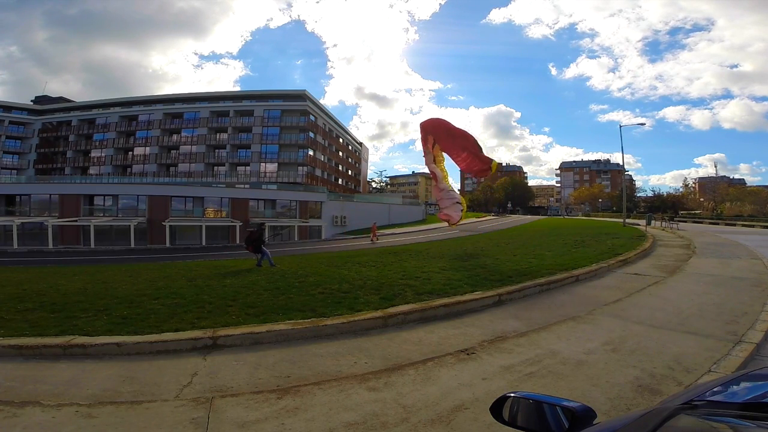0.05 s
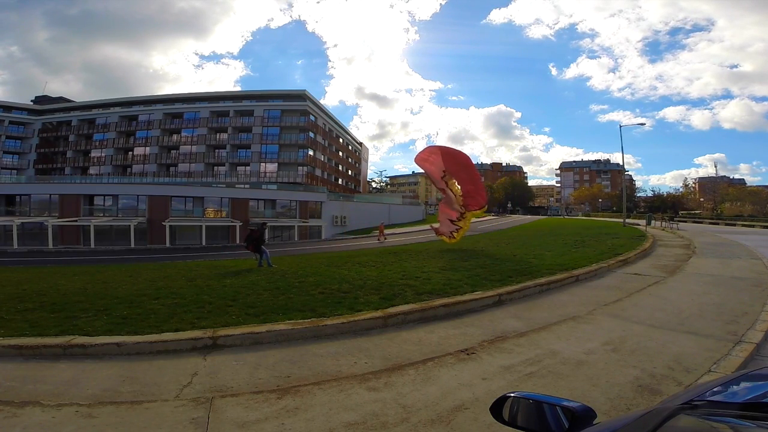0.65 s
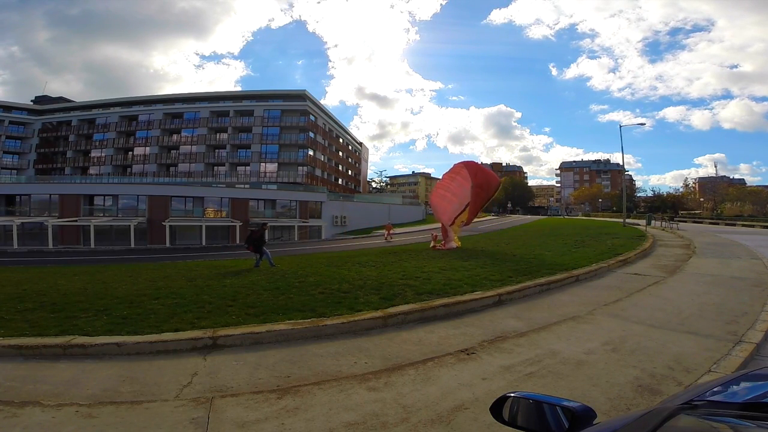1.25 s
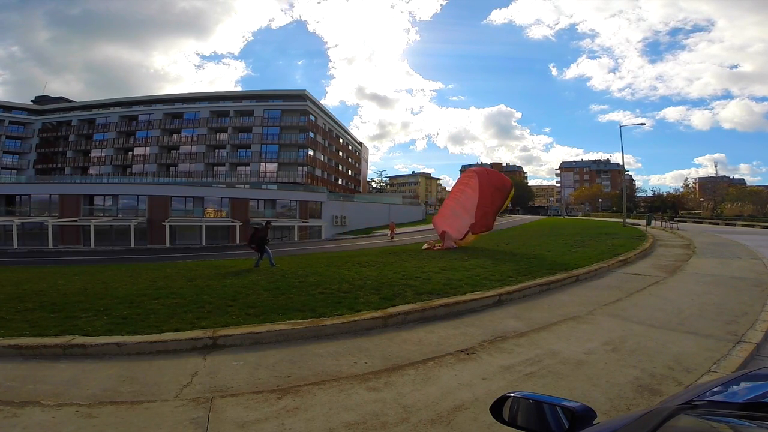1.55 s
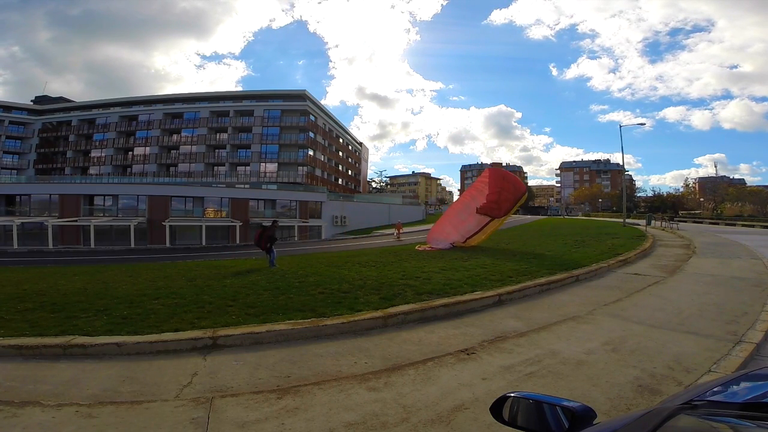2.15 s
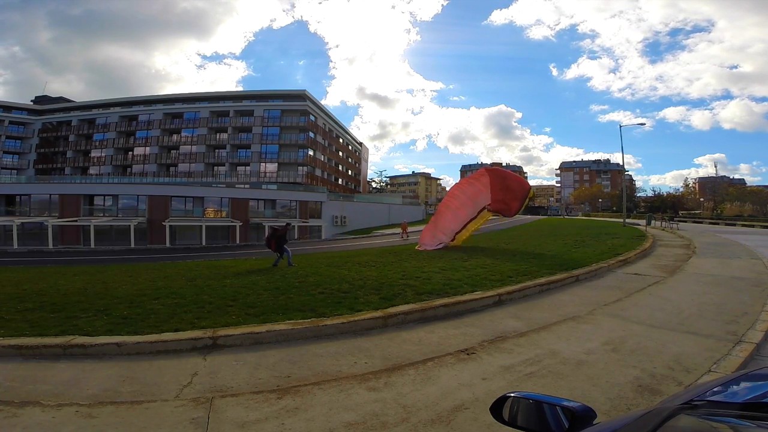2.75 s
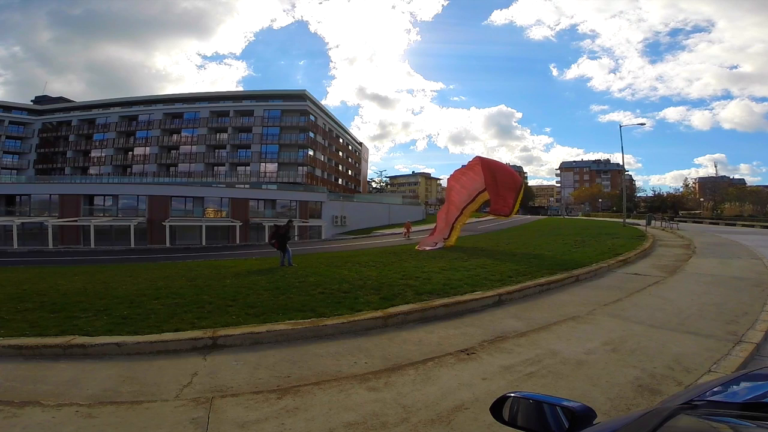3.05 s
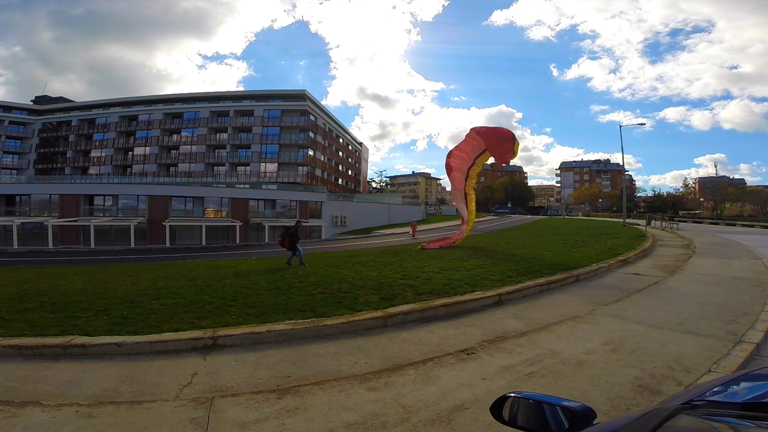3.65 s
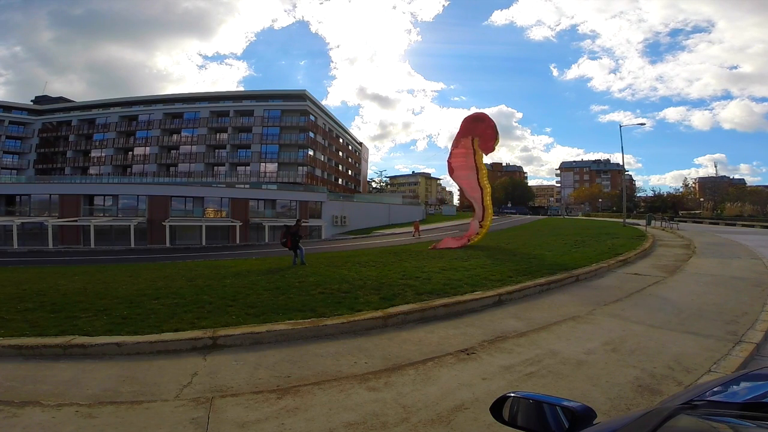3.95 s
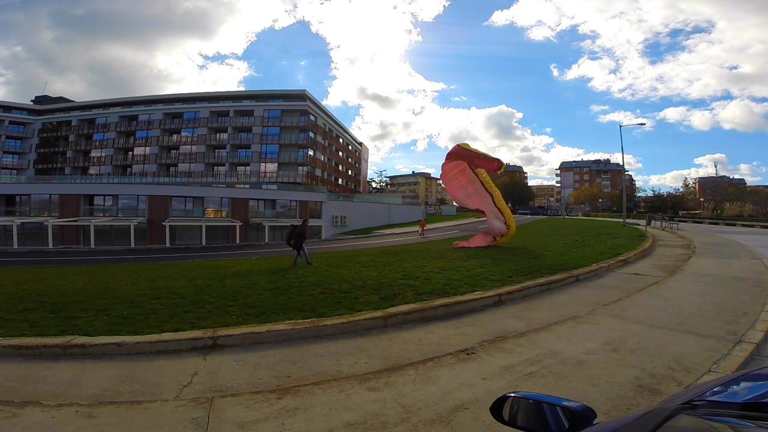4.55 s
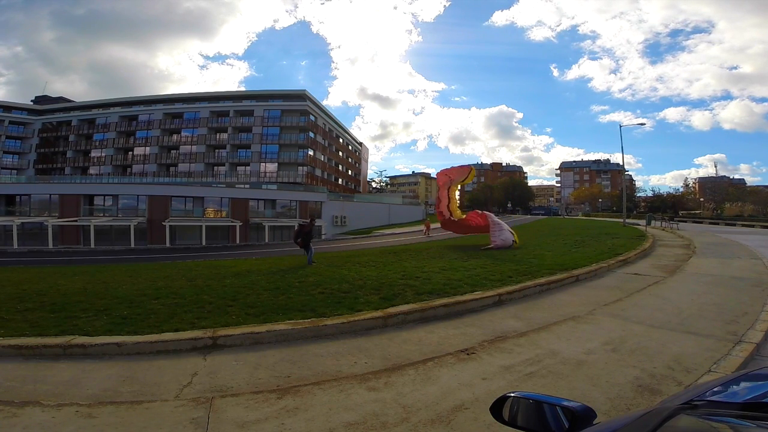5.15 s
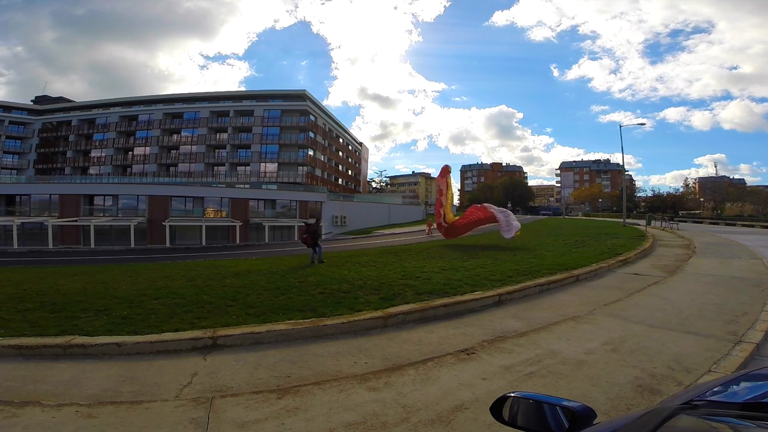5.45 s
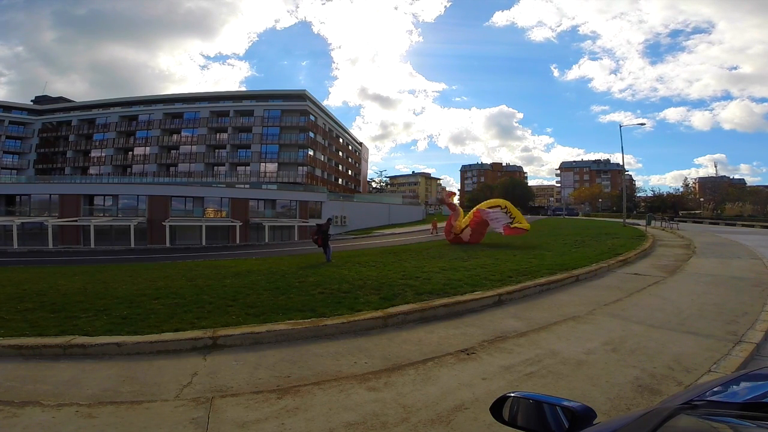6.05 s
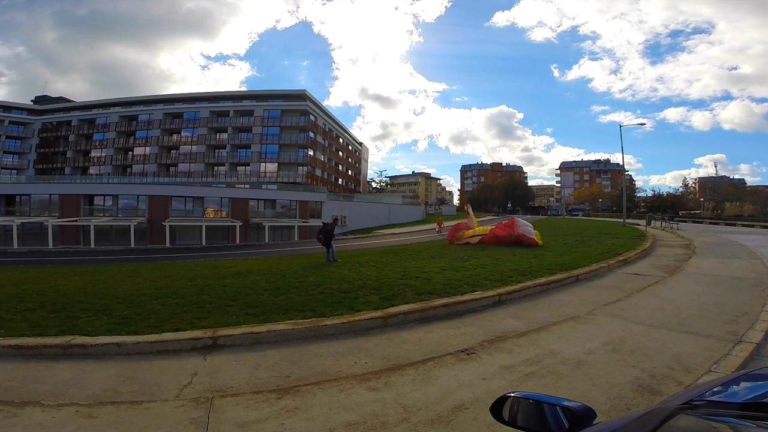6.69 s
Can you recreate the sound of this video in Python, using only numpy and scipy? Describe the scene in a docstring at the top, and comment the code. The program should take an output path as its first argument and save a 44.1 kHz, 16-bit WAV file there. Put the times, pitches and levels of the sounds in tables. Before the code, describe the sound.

Gusty wind buffets a microphone on an open lawn, a deep, uneven rumble dotted with soft thumps. Early on, a big fabric kite swishes and gives one small snap. The wind then swells into a roaring, crackling rush for a couple of seconds before dropping back to a fitful rumble. Thin cloth rustle and a faint wash of distant traffic lie far beneath the wind.

```python
"""On an open lawn, gusty wind buffets a camera's microphone while a big fabric kite tosses about.
Turbulence carries eddies past the port, rumbling and roaring as the wind swells and slackens. Single
large eddies add separate thumps, and in the strongest gust the flow separates from the housing in a
crackling rush. Behind it lie distant traffic, a faint microphone hiss and the thin rustle of the
cloth, which swishes, zips and snaps once."""
import sys
import numpy as np
from scipy import signal
from scipy.fft import rfft, irfft
from scipy.io import wavfile
from scipy.ndimage import uniform_filter1d, minimum_filter1d, map_coordinates

SR = 44100
rng = np.random.default_rng(int(sys.argv[2]) if len(sys.argv) > 2 else 0)


def to_wav(s):
    """Save 16-bit WAV."""
    ch = np.atleast_2d(s).T  # columns
    pcm = np.round(np.clip(ch, -1, 1) * 32767)  # PCM
    wavfile.write(sys.argv[1], SR, pcm.astype(np.int16))


N = 305172
TIME = np.arange(N) / SR
FREQ_HZ = np.fft.rfftfreq(N, 1 / SR)


def gain_of(db):
    """Amplitude grows tenfold for every 20 dB."""
    return 10 ** (np.asarray(db) / 20)


def unit_rms(x):
    """Normalisation to a mean power of 1."""
    return x / np.sqrt(np.mean(x ** 2) + 1e-20)


def curve(rows):
    """Linear interpolation between rows of time and value."""
    return np.interp(TIME, *np.transpose(rows))


def bell(s, half):
    """A Gaussian pulse that falls to 1/e at half seconds either side of time s."""
    return np.exp(-((TIME - s) / half) ** 2)


def coloured(x, colour):
    """Spectral shaping by rows of frequency in Hz and gain in dB."""
    hz, db = np.transpose(colour)
    return irfft(rfft(x) * gain_of(np.interp(np.log(FREQ_HZ + 1), np.log(hz), db)), N)


def noise(colour):
    """Filtered Gaussian noise of rms 1."""
    return unit_rms(coloured(rng.standard_normal(N), colour))


def flutter(slow_hz, fast_hz):
    """Random modulation of rms 1, mostly between two rates."""
    band = FREQ_HZ / (FREQ_HZ + slow_hz) / (1 + (FREQ_HZ / fast_hz) ** 2)
    return unit_rms(irfft(rfft(rng.standard_normal(N)) * band, N))


def eddies(colour, hold_s, speed=1):
    """Frozen turbulence swept past at a relative speed, its power levelled over spans of hold_s."""
    travel = np.cumsum(speed * np.ones(N))
    pressure = map_coordinates(noise(colour), [travel], order=3, mode="grid-wrap")
    window = np.hanning(int(hold_s * SR))
    power = signal.fftconvolve(pressure ** 2, window / window.sum(), "same")
    return pressure / np.sqrt(power + 1e-9)


def buffet(lift_db, level_db=-17):
    """The largest eddies pass slowly, so their pressure fluctuates at the lowest frequencies."""
    # Spectrum of the buffeting. Each row: frequency in Hz, relative density in dB.
    colour = [(8, -14), (18, 1.5), (28, 1), (60, 1.5), (95, -1.5), (140, -7.5), (260, -35.5), (600, -89.5)]
    return eddies(colour, hold_s=0.14) * gain_of(level_db + lift_db)


def rumble(lift_db, speed, level_db=-16):
    """Middle-sized eddies rumble at frequencies proportional to their convection speed."""
    # Spectrum of the rumble. Each row: frequency in Hz, relative density in dB.
    colour = [(50, -28.5), (90, -10), (130, -0.5), (200, -0.5), (300, -3.5), (400, -8), (520, -16.5),
              (800, -26.5), (1500, -56.5), (4000, -89)]
    return eddies(colour, hold_s=0.098, speed=speed) * gain_of(level_db + lift_db)


def roar(lift_db, level_db=-26.5):
    """Small eddies pass quickly, so their pressure fluctuations reach the midrange."""
    # Spectrum of the roar. Each row: frequency in Hz, relative density in dB.
    colour = [(150, -27), (350, -1.5), (500, 2), (680, -4), (850, -6), (1020, -11), (1250, -20.5),
              (1500, -25), (1950, -28.5), (2900, -47.5), (3600, -48), (5000, -56.5), (12000, -72.5)]
    return eddies(colour, hold_s=0.02) * gain_of(level_db + lift_db)


def wind():
    """Turbulence is intermittent: its noise comes in bursts, and smaller eddies gain more from a gust."""
    # Wind at the microphone. Each row: time in seconds, strength in dB relative to its usual blow.
    strengths = [(0, -4.5), (0.16, -2.5), (0.4, -6.0), (0.66, -6), (1.0, -4.5), (1.45, 1), (2.1, 2),
                 (2.95, 2), (3.45, 1), (3.66, 1), (3.86, 1.75), (4.14, 3), (4.3, 0.17), (4.41, 3),
                 (4.58, -1.27), (5.36, 1.37), (5.5, -0.5), (6.1, -4.5), (6.3, 1.5), (6.92, -0.23)]
    # Flow separation. Times in seconds: starts to tear off, fully torn, starts to settle, reattached.
    separation_s = [1.679, 1.879, 3.9, 4.348]
    strength_db, blast_db, stall_db = curve(strengths), blasts(), stalls()
    torn = np.interp(TIME, separation_s, [0, 1, 1, 0])
    bursts = flutter(slow_hz=3.1, fast_hz=60) * gain_of(-0.53 * strength_db)  # a slack wind is fitful
    speed = 2 ** (-0.01 * strength_db * (1 - torn))  # the pitch sags slightly as the wind grows
    surge_db = 0.81 * strength_db + bursts + 0.84 * blast_db - 0.47 * stall_db
    deep = buffet(0.23 * strength_db + 2 * bursts - 0.28 * stall_db)
    middle = rumble(surge_db - 2 * torn, speed)  # gives up 2 dB to the wake
    deep += torn * wake(surge_db)
    # While one large eddy covers the port it pushes the others aside, the deepest most.
    strikes, covered = thumps()
    large = strikes + deep * gain_of(-6 * covered) + middle * gain_of(-3 * covered)
    fine_db = 1.51 * unit_rms(large) - stall_db  # small eddies ride on the pressure of the large
    roar_db = 1.27 * strength_db + blast_db + 1.46 * bursts + fine_db
    rush_db = 1.2 * bursts + fine_db - 2.9 * stall_db  # in a lull the rush collapses furthest
    return large + roar(roar_db) + rush(torn, rush_db)


def cloth(rustle_db=12.5, crinkle_db=1.26):
    """Flexing fabric radiates noise; fine crinkles modulate its rustle, swishes and zips alike."""
    # Course of the rustle. Each row: time in seconds, relative level in dB.
    levels = [(0, -63.5), (0.7, -64), (1.3, -67), (1.56, -65.5), (1.8, -67), (2.2, -77.5), (2.9, -70.5),
              (3.2, -74), (4.3, -66.5), (4.8, -67.5), (5.15, -66.5), (5.42, -62.5), (5.95, -69),
              (6.27, -67.5), (6.5, -70), (6.92, -70)]
    # Spectrum of the rustle. Each row: frequency in Hz, relative density in dB.
    colour = [(1000, -5), (2200, 4), (3300, 2.5), (4400, 0), (5200, -0.5), (6500, -8.5), (8200, -9.5),
              (9500, -14.5), (10050, -12.5), (10800, -16.5), (13500, -22), (15000, -32.5)]
    crinkle = gain_of(crinkle_db * flutter(slow_hz=10, fast_hz=300))
    rustle = noise(colour) * gain_of(curve(levels) + rustle_db)
    return crinkle * (rustle + swishes() + zips())


def traffic(level_db=-42.5, swell_db=0.5):
    """Incoherent sources on far streets sum to a smooth, slowly swelling wash."""
    # Spectrum of far traffic and city air. Each row: frequency in Hz, relative density in dB.
    colour = [(40, 3), (400, -9), (1000, 4), (1500, -11.5), (2000, -10.5), (2800, -24), (4000, -25),
              (6000, -33), (12000, -53.5)]
    return noise(colour) * gain_of(level_db + swell_db * flutter(slow_hz=0.3, fast_hz=3.1))


def housing(x):
    """The camera's housing acts as a notch filter on the treble of sound from afar."""
    # Notches of the housing. Each row: centre in Hz, half width in Hz, depth in dB.
    notches = [(2940, 200, 2.5), (4750, 160, 4), (9330, 270, 5.5)]
    cut_db = sum(db * np.exp(-((FREQ_HZ - centre) / half) ** 2) for centre, half, db in notches)
    return irfft(rfft(x) * gain_of(-cut_db), N)


def mic_hiss(level_db=-72):
    """The microphone's steady self-noise is lifted by a resonance of its port."""
    # Spectrum of the hiss. Each row: frequency in Hz, relative density in dB.
    colour = [(3000, -0.5), (8500, 3), (9400, 0), (10050, 9.5), (10800, -3.5), (13400, -5), (14300, -18.5)]
    return noise(colour) * gain_of(level_db)


def swishes():
    """A fold whipping over makes noise that grows and decays exponentially."""
    # Whipping folds. Each row: peak time, rise and fall constants, all in seconds, level in dB.
    folds = [(.08, 0.49, 0.14, -59), (.315, 0.051, 0.077, -59), (.51, 0.045, 0.026, -53),
             (.553, 0.067, 0.06, -48), (.6, 0.027, 0.028, -50), (4.15, 0.5, 0.28, -57.5),
             (4.55, 0.033, 0.026, -55), (5.45, 0.062, 0.045, -52.5), (5.68, 0.037, .02, -53)]
    # Spectrum of a swish. Each row: frequency in Hz, relative density in dB.
    colour = [(1000, -5), (2000, 4), (4000, 2.5), (5500, -3.5), (6500, -4), (7200, -0.5), (7750, -7),
              (8300, -28.5), (12000, -43)]
    whip = sum(gain_of(db) * np.exp(-np.maximum((s - TIME) / rise, (TIME - s) / fall))
               for s, rise, fall, db in folds)
    return noise(colour) * whip


def thumps(reach=1.66):
    """Single large eddies strike as pressure wave packets; also gives their cover of the port, 0 to 1."""
    # Eddy strikes. Each row: time and half length in seconds, frequency in Hz, envelope peak in dB.
    strikes = [(0.16, 0.0058, 124, -3), (0.318, 0.0089, 117, -6), (0.655, 0.0064, 100, -3.5),
               (0.675, 0.01, 60, -3), (0.695, 0.0032, 230, -9.5), (0.712, 0.0027, 90, -3),
               (0.734, 0.016, 29.8, -9), (0.832, 0.0071, 90, -12), (0.923, 0.007, 70, -3.5),
               (1.036, 0.005, 135, -5.5), (1.068, 0.012, 65, -8.5), (1.097, 0.0052, 115, -4),
               (1.253, 0.009, 114, -2.5), (1.427, 0.0042, 153, -4), (1.448, 0.012, 49.7, -4.5),
               (1.553, 0.0063, 357, -6), (1.557, 0.01, 84, -5.5), (1.632, 0.0094, 84, -11),
               (1.757, 0.0033, 142, -5), (1.784, 0.0044, 129, -3), (1.87, 0.0029, 135, 2),
               (1.897, 0.0039, 139, -7), (1.981, 0.0086, 45, -4), (2.004, 0.0064, 122, -3),
               (2.185, 0.0041, 121, -0.5), (2.682, 0.0082, 138, -5.5), (2.735, 0.017, 102.4, -5.5),
               (2.905, 0.011, 126, -8), (2.968, 0.0074, 135, -4.5), (3.037, 0.0051, 119, -4),
               (3.158, 0.0063, 115, -4), (3.189, 0.01, 62, -1), (3.202, 0.0034, 108, 2.5),
               (3.533, 0.0082, 147, -0.5), (3.554, 0.0058, 116, -3), (3.75, 0.0056, 106, -4),
               (3.831, 0.0068, 100, -7.5), (3.894, 0.005, 99, -4.5), (3.924, 0.0034, 121, -1),
               (4.041, 0.0035, 135, -5), (4.137, 0.0059, 97, -3), (4.156, 0.0019, 203, -3),
               (4.602, 0.0081, 71, -4.5), (4.704, 0.0024, 202, -1.5), (4.913, 0.0045, 169, -2.5),
               (5.22, 0.0058, 198, -4), (5.684, 0.004, 130, -2), (5.773, 0.0043, 64.6, -6),
               (5.914, 0.0076, 70, -5), (5.967, .003, 434.2, -9), (5.974, 0.0013, 396, -3.5),
               (5.981, 0.0045, 74, -2.5), (6.081, 0.006, 90, -5.5), (6.146, 0.016, 44.7, -6),
               (6.24, 0.0063, 148, -6), (6.294, 0.0036, 112, -4.5), (6.583, 0.0033, 116, -2)]
    phases = rng.random(len(strikes))
    pressure = sum(gain_of(db) * bell(s, half) * np.sin(2 * np.pi * (hz * (TIME - s) + phase))
                   for (s, half, hz, db), phase in zip(strikes, phases))
    covered = np.max([bell(s, reach * half) for s, half, _, _ in strikes], axis=0)
    return pressure, covered


def zips():
    """Friction of cloth sliding on cloth gives thin, high bands of hiss."""
    # Slides. Each row: time and half length in seconds, centre and half width in Hz, level in dB.
    slides = [(0.32, 0.065, 7350, 500, -60), (0.57, 0.05, 9500, 2000, -65), (1.54, 0.046, 8800, 1900, -63),
              (1.74, 0.09, 8700, 1200, -67), (3.76, 0.06, 7100, 400, -67.5), (4.3, 0.05, 7300, 600, -66),
              (5.14, 0.1, 9500, 2600, -68), (6.28, 0.13, 10000, 2600, -69)]
    white = rfft(rng.standard_normal(N))
    sound = np.zeros(N)
    for s, half, centre, width, db in slides:
        band = irfft(white / (1 + ((FREQ_HZ - centre) / width) ** 4), N)
        sound += gain_of(db) * bell(s, half) * unit_rms(band)
    return sound


def snap(start_s=0.5475, level_db=-31.5, rise_s=0.00088, fade_s=0.0054):
    """Sudden tension radiates a broadband transient as the fabric pulls taut at the height of a swish."""
    # Spectrum of the snap. Each row: frequency in Hz, relative density in dB.
    colour = [(1500, 1), (2360, -1), (3000, 1), (3900, 4), (5200, -5), (6450, 5), (7200, -4), (7600, -11),
              (8300, -21), (12000, -32)]
    age = np.maximum(TIME - start_s, 0)
    return noise(colour) * gain_of(level_db) * (1 - np.exp(-age / rise_s)) * np.exp(-age / fade_s)


def stalls():
    """Attenuation in dB as the flow stalls, losing its small eddies, and abruptly catches again."""
    # Lulls. Each row: time in seconds, half length in seconds, depth for the roar in dB.
    lulls = [(0.592, 0.04, 4), (0.747, 0.033, 16), (0.882, 0.027, 11), (1.121, 0.016, 9.5),
             (1.195, 0.05, 3), (1.706, 0.028, 17.5), (1.978, 0.021, 8), (3.219, 0.025, 2),
             (3.679, 0.044, 6.5), (4.204, 0.062, 4), (4.589, 0.022, 5), (5.446, 0.033, 4), (5.908, 0.04, 3),
             (6.019, 0.029, 10.5), (6.125, 0.043, 3), (6.65, 0.016, 4.5)]
    return sum(depth * np.exp(-((TIME - s) / half) ** 4) for s, half, depth in lulls)


def blasts(rise_share=0.27):
    """Gain in dB from short blasts of air, each with a fast attack and a slower decay."""
    # Blasts. Each row: start in seconds, seconds until sunk to half the lift, lift of the roar in dB.
    gusts = [(0.672, 0.034, 6), (0.791, 0.05, 0.5), (0.932, 0.067, 2.5), (1.021, 0.02, 7.5),
             (1.074, 0.022, 8), (1.252, 0.038, 1.5), (1.534, 0.039, 2.5), (1.748, 0.061, 2.5),
             (1.827, 0.1, 4.5), (2.148, 0.043, 3.5), (2.349, 0.036, 6.5), (2.886, 0.039, 4.5),
             (3.053, 0.12, 3.5), (3.743, 0.24, 0.5), (4.105, 0.055, 5), (4.618, 0.11, 2.5),
             (5.313, 0.065, 2), (5.801, 0.04, 8.5), (6.205, 0.065, 3), (6.482, 0.05, 6.5), (6.695, 0.14, 3)]
    return sum(np.interp((TIME - s) / length, [0, rise_share, 1, 2], [0, db, db / 2, 0])
               for s, length, db in gusts)


def wake(lift_db, level_db=-23):
    """Separated flow leaves a booming wake behind the housing."""
    # Spectrum of the wake. Each row: frequency in Hz, relative density in dB.
    colour = [(40, -20), (75, -5), (100, 7), (130, -6), (175, -4), (260, -19.5), (600, -85)]
    return eddies(colour, hold_s=0.085) * gain_of(level_db + lift_db)


def rush(torn, jitter_db, hiss_db=7.0, crackle_db=2.5):
    """Flow separation at the housing makes a rasping hiss with spurts and cracks."""
    # Course of the rush. Each row: time in seconds, relative level in dB.
    levels = [(1.72, -46), (1.84, -39.5), (1.89, -49), (1.93, -38.5), (2.06, -35.5), (2.23, -41),
              (2.35, -33.5), (2.58, -35.5), (2.72, -36), (2.92, -34), (3.27, -40.5), (3.47, -36),
              (3.63, -48), (3.76, -41.5), (3.85, -36), (4.25, -53)]
    # Sharp spurts of air. Each row: time in seconds, half length in seconds, level in dB.
    jets = [(1.931, 0.0097, -36.5), (2.014, 0.0079, -44.5), (2.071, 0.016, -40.5), (2.467, 0.005, -37),
            (2.598, 0.06, -38.5), (2.93, 0.041, -47), (3.372, 0.029, -44), (3.556, 0.0097, -42),
            (3.758, 0.007, -42), (3.805, 0.006, -48), (4.052, 0.012, -46), (4.129, 0.009, -45)]
    # Spectra of the hiss and the spurts. Each row: frequency in Hz, relative density in dB.
    hiss_colour = [(300, -13.5), (600, 14.5), (1000, 16), (1200, 6), (1500, -3), (1950, 2.5), (2800, -11.5),
                   (4050, -19), (4700, -29.5), (6000, -41), (9000, -53), (14000, -73)]
    spurt_colour = [(1200, 3), (2200, 9), (3000, 3), (4100, -4), (4800, -17), (5600, -22.5), (8000, -45),
                    (14000, -71)]
    tearing = np.sqrt(torn) * gain_of(curve(levels) + jitter_db)
    hiss = tearing * gain_of(hiss_db) * noise(hiss_colour)
    spurts = noise(spurt_colour) * sum(gain_of(db) * bell(s, half) for s, half, db in jets)
    rasp = gain_of(crackle_db * flutter(slow_hz=130, fast_hz=450))
    return rasp * (hiss + spurts) + cracks(tearing)


def cracks(tearing, per_s=360, size_db=-0.2, spread_db=3.5):
    """Tiny vortices burst on the port as impulses: shot noise following the rush, and a few loud ones."""
    # The loudest cracks. Each row: time in seconds, peak in dB.
    loudest = [(2.046, -26), (2.304, -18.5), (2.335, -21), (2.423, -21.5), (2.469, -18), (2.487, -20),
               (2.516, -16.5), (2.589, -14), (2.794, -15.5), (2.904, -20), (2.992, -19), (3.027, -17.5),
               (3.35, -19.5), (3.386, -18.5)]
    # Spectrum of a crack. Each row: frequency in Hz, relative density in dB.
    colour = [(200, -13.5), (900, 2.5), (1500, 6.5), (2100, 2.5), (3000, -2.5), (4200, -12), (4900, -19.5),
              (6000, -27), (9000, -45.5), (14000, -60)]
    sizes = gain_of(size_db + spread_db * np.minimum(rng.exponential(1, N), np.pi))
    spikes = tearing * sizes * (rng.random(N) < per_s / SR)
    for s, db in loudest:
        spikes[round(s * SR)] += gain_of(db)
    unit_peak = coloured(signal.unit_impulse(N), colour).max()
    return coloured(spikes * rng.choice([-1, 1], N), colour) / unit_peak


def scene():
    """Superposition of the wind at the microphone, the sounds of the lawn and the self-noise."""
    return (wind() + housing(cloth() + snap() + traffic()) + mic_hiss())[None]


def record(dry):
    """Peak limiting eases down the largest pressures; short end fades and a low-pass filter follow."""
    ceiling, cutoff_hz, fade_s = 0.9, 15250, 0.003
    allowed = np.minimum(1, ceiling / (abs(dry[0]) + 1e-9))
    held = minimum_filter1d(allowed, size=441)
    limited = dry * uniform_filter1d(uniform_filter1d(held, size=221), size=221)
    low_pass = signal.firwin(511, cutoff_hz, window=("kaiser", 9), fs=SR)
    ends = np.minimum(1, np.minimum(TIME, TIME[::-1]) / fade_s)
    return signal.oaconvolve(limited * ends, low_pass[None], "same")


dry = scene()
out = record(dry)
to_wav(out)
```